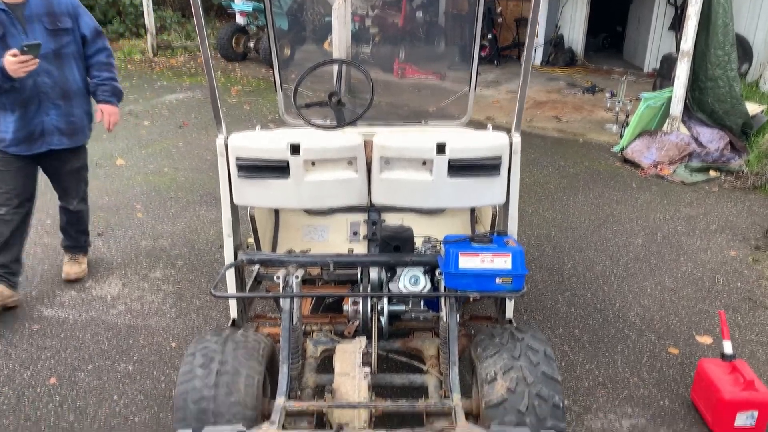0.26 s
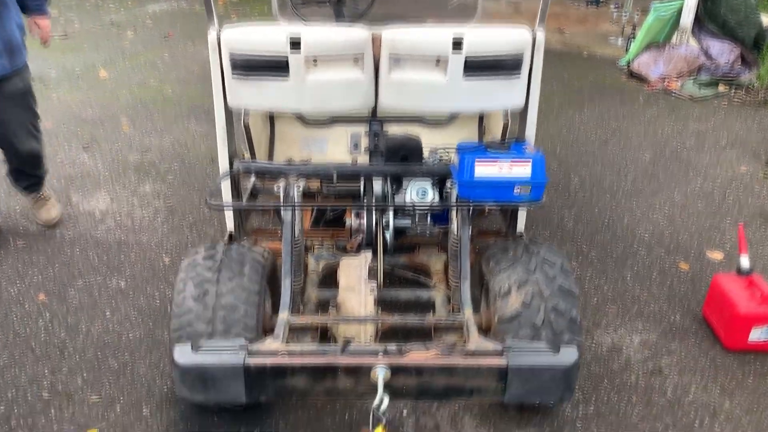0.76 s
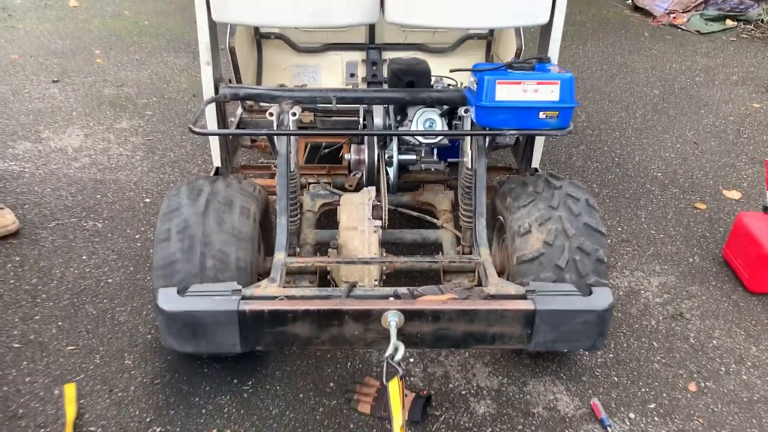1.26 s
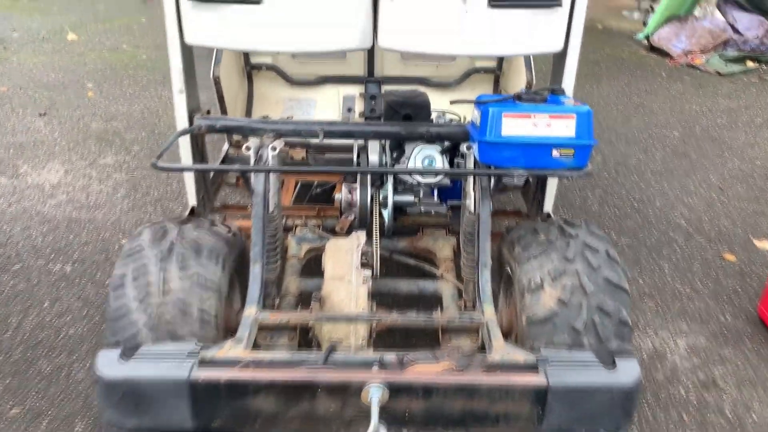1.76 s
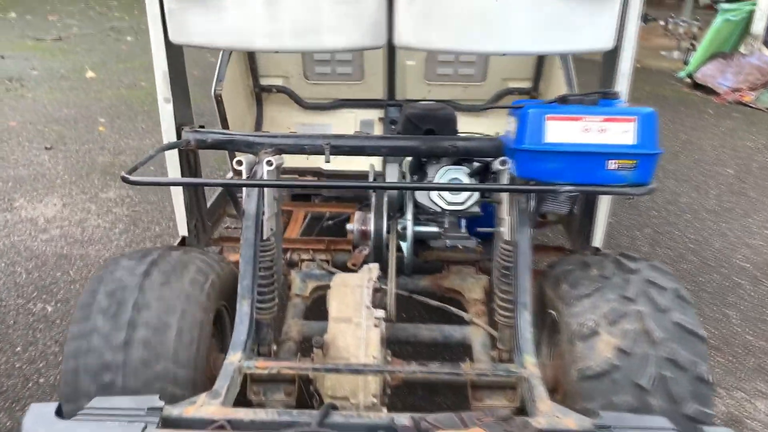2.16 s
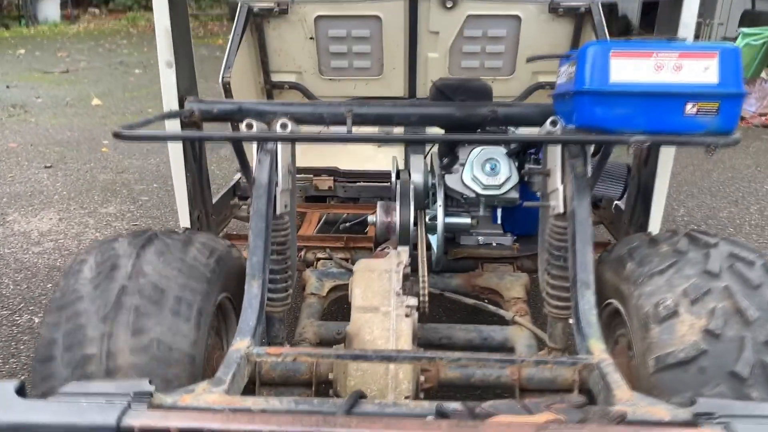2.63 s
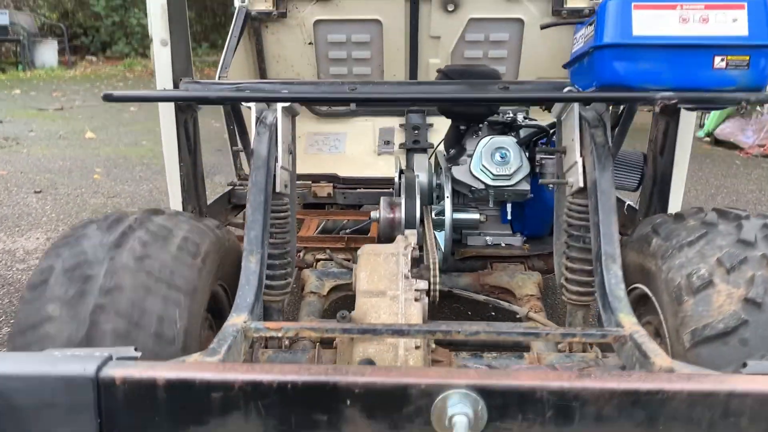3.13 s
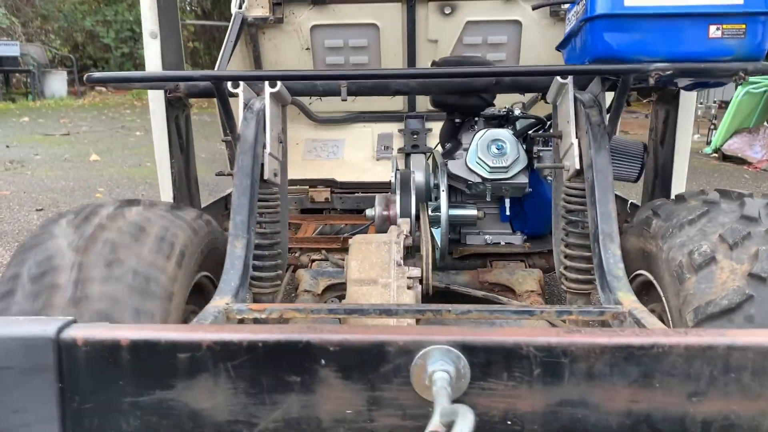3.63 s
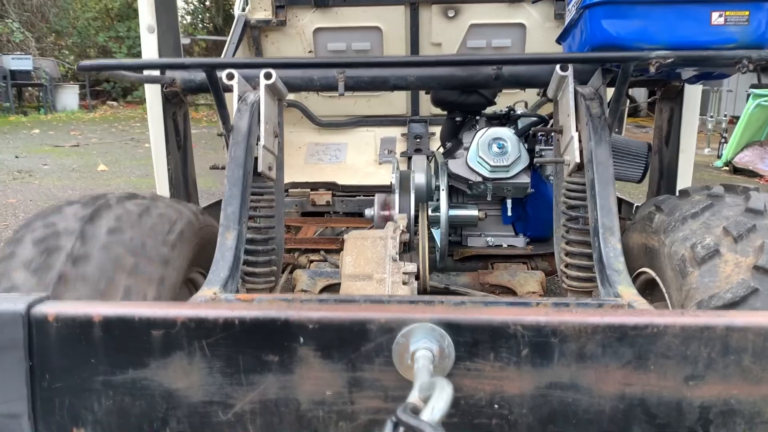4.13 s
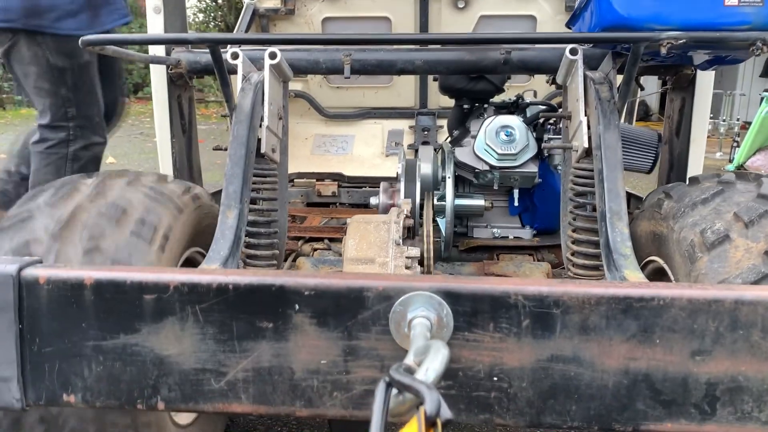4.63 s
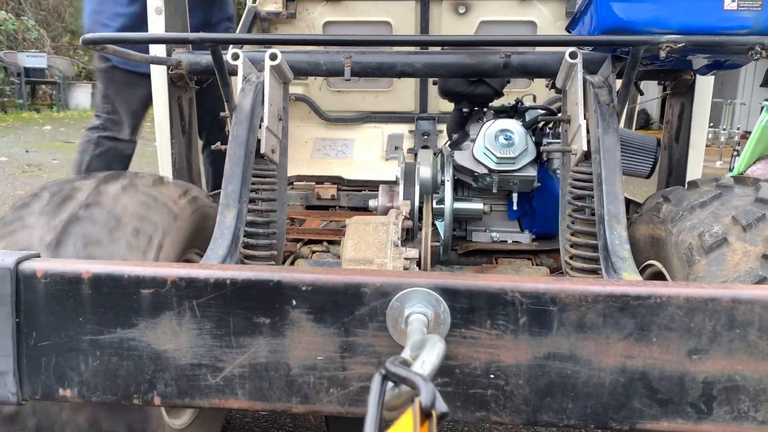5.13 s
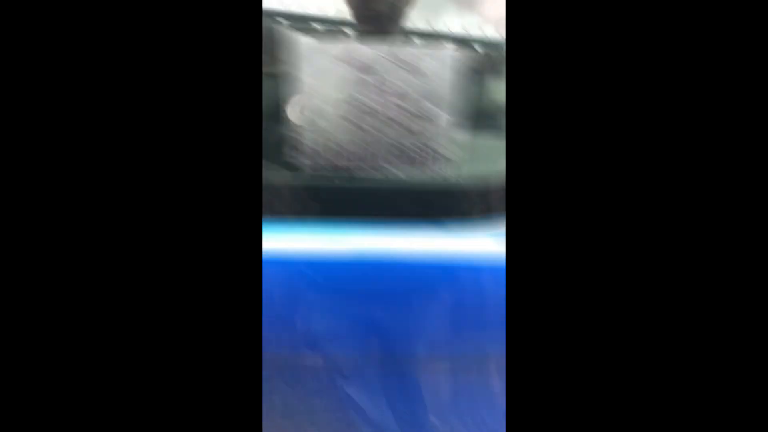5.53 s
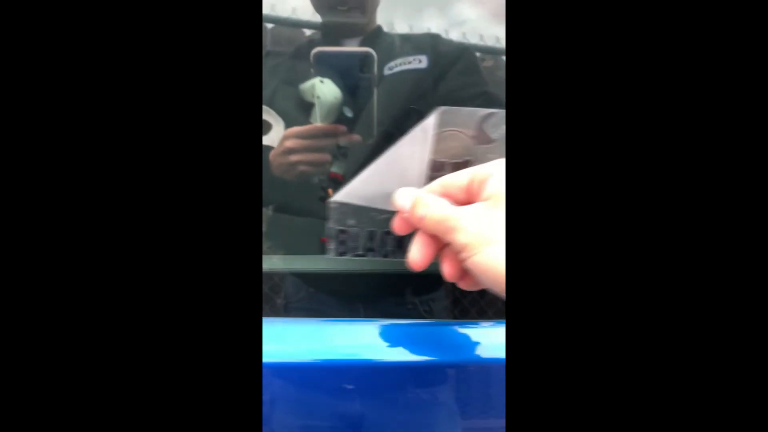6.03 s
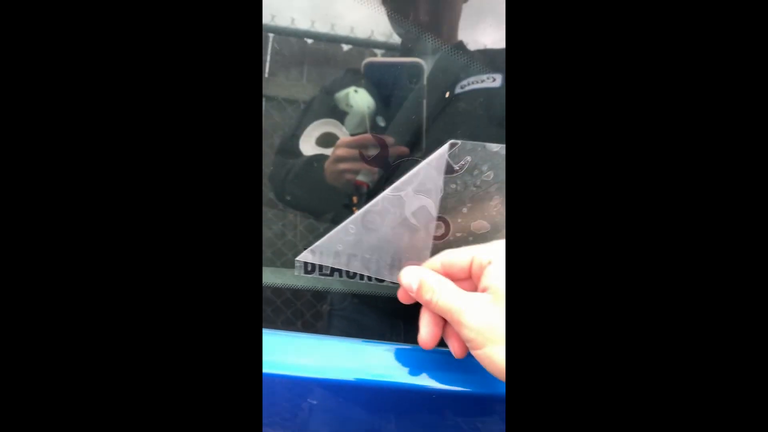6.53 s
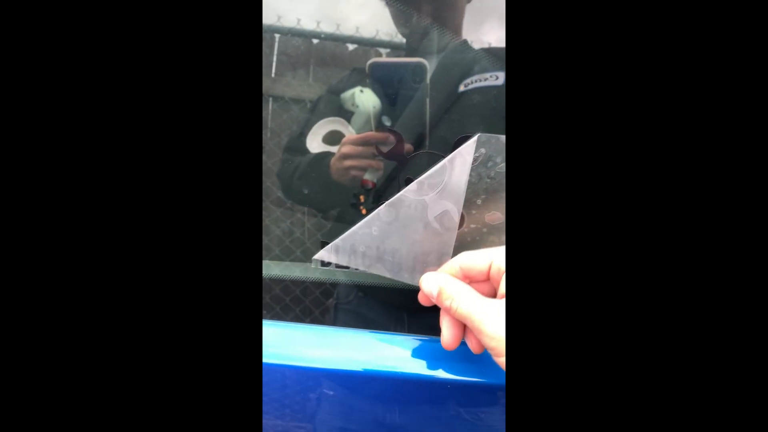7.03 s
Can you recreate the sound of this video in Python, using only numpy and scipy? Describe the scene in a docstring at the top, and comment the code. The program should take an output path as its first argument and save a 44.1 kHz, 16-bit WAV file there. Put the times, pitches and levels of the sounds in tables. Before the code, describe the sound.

Outdoors on asphalt, a small one-cylinder gasoline engine runs loud and lumpy, surging in runs of four to seven hard metallic knocks, then sagging into soft thumps, clatter, hiss and a hollow muffler hoot. The stereo microphone walks closer. An instant cut drops to a very quiet place with low rumble and hum, where plastic film crackles and snaps as it is peeled off glass.

```python
"""A one-cylinder four-stroke in a golf cart hunts at idle on a driveway as the stereo microphone walks up to it:
runs of hard, knocking firings, with faint ones between as it coasts on soft thumps, clatter and a hooting can.
Pulses timed by the engine cycle and shaped noise make the engine; asphalt and yard send the sound back.
An abrupt cut leads to a quiet place with a low rumble and hum, where a hand peels plastic film off
a car window: trains of tiny impacts crackle, noise bursts snap and a finger scrapes the glass."""
import sys
import numpy as np
from scipy import signal
from scipy.fft import rfft, irfft, next_fast_len
from scipy.io import wavfile
from scipy.ndimage import uniform_filter1d, map_coordinates

SR = 44100
rng = np.random.default_rng(int(sys.argv[2]) if len(sys.argv) > 2 else 0)


def log_audio(samples):
    """Write samples as a 16-bit WAV file to the path given in sys.argv[1]."""
    # one column per channel
    frames = np.atleast_2d(samples).T
    # limit to full scale, then quantise
    limited = np.clip(frames, -1, 1)
    pcm = np.round(limited * 32767).astype(np.int16)
    wavfile.write(sys.argv[1], SR, pcm)


N = 321038
CUT_S = 5.517  # the driveway gives way to the quiet place

# Firings that stand out, hard ones in runs and faint ones between. Each row: start in seconds, level in dB,
# low ring in Hz, high ring in Hz, high over low in dB, blast length in seconds, spit of gas in dB before its trim.
FIRINGS = [(0.001, -7.5, 710.0, 1877, 8.5, 0.002, -27), (0.044, -7, 670.0, 1850, 8, 0.003, -26.5),
           (0.087, -9.5, 1210.0, 1880, 8, 0.004, -27.5), (0.367, -20.5, 1350.0, 2130, 11, 0.006, -35.5),
           (0.467, -19, 1270.0, 2130, 6, 0.005, -32.0), (0.518, -14, 1350.0, 1770.0, 8.5, 0.003, -32.5),
           (0.569, -13.5, 1220.0, 1900, 1.5, 0.004, -26), (0.614, -10, 1310.0, 1810, 4.5, 0.003, -29.5),
           (0.658, -16.0, 880.0, 2650, -4.5, 0.004, -29.5), (0.702, -18, 1350.0, 1390, 0.0, 0.004, -36.0),
           (0.93, -24.0, 800.0, 2100.0, -3.5, 0.006, -45), (0.982, -22.0, 820.0, 2120, -5, 0.005, -40.5),
           (1.084, -21.5, 680.0, 1820, 9, 0.005, -33), (1.196, -11, 830.0, 2100, 2.5, 0.003, -26.5),
           (1.248, -14, 1010.0, 1770, 1.5, 0.003, -31), (1.304, -21, 690.0, 1490, 0, 0.006, -37.5),
           (1.354, -10.5, 700.0, 1570, 1.5, 0.005, -25.0), (1.405, -7.5, 670.0, 1803, 3, 0.002, -25.5),
           (1.452, -8.5, 840.0, 1750, 1, 0.004, -25.5), (1.493, -8.5, 940.0, 2120, 6.5, 0.003, -24.0),
           (1.533, -11.5, 830.0, 1510, -2, 0.003, -27.5), (1.899, -22, 820.0, 1640.0, -13, 0.005, -38),
           (1.999, -16, 1100.0, 2140, -4, 0.003, -28.5), (2.099, -10, 640.0, 1660, 6.5, 0.004, -23.5),
           (2.15, -8.5, 800.0, 1780, 0.5, 0.005, -26.0), (2.198, -9.5, 1350.0, 1780.0, 1.5, 0.004, -26),
           (2.238, -9.0, 1000.0, 1880, 2, 0.002, -25.5), (2.286, -20.5, 1350.0, 1330, 4, 0.004, -37),
           (2.563, -20.5, 750.0, 1910, -8, 0.003, -34.0), (2.611, -18, 900.0, 1960.0, -7.5, 0.002, -34.5),
           (2.663, -18.5, 930.0, 1450.0, -6.5, 0.005, -34.5), (2.716, -19, 650.0, 1540, -2.0, 0.007, -31.5),
           (2.818, -6.5, 1020.0, 1526, 5, 0.003, -27.0), (2.865, -6.5, 1100.0, 2340, -1, 0.003, -26),
           (2.914, -8.5, 1030.0, 1440.0, 7.5, 0.003, -30), (2.956, -15.5, 840.0, 2140, -0.5, 0.004, -31.5),
           (3.237, -20.5, 1060.0, 1670.0, -6, 0.004, -33), (3.285, -20, 630.0, 1810.0, -14.5, 0.004, -35.0),
           (3.336, -15.0, 1180.0, 1770, -5.5, 0.003, -29.5),
           (3.387, -13.5, 1070.0, 1680.0, -2.5, 0.002, -29.5), (3.433, -11, 990.0, 1650, -0.5, 0.004, -27),
           (3.48, -11, 1080.0, 1461, -6.0, 0.002, -28), (3.523, -14.5, 1200.0, 2130.0, -6, 0.003, -28.0),
           (3.567, -17.5, 770.0, 1810, -3.5, 0.006, -35.5), (3.85, -25, 580.0, 1568, -3, 0.007, -39),
           (3.899, -22.5, 920.0, 2140.0, -8, 0.007, -37), (4.005, -10.5, 1090.0, 1530, -5, 0.002, -28),
           (4.056, -9, 1060.0, 1790, 4, 0.003, -26.5), (4.106, -7.5, 1190.0, 1650.0, 4.5, 0.003, -25.5),
           (4.151, -9, 1060.0, 1630, 3, 0.004, -22), (4.197, -9, 1080.0, 1960.0, -1, 0.003, -27.0),
           (4.238, -14.5, 1050.0, 2316, -6, 0.003, -35), (4.464, -24.5, 1130.0, 1800.0, -10, 0.005, -45),
           (4.562, -20, 1180.0, 1760, -6.5, 0.003, -33), (4.668, -18, 1160.0, 1735, -12.5, 0.005, -39.5),
           (4.776, -6, 1350.0, 1690, 1, 0.002, -29), (4.83, -11, 1170.0, 2040, 4, 0.003, -27),
           (4.88, -9, 1190.0, 1660, 6, 0.003, -26.5), (4.927, -9.5, 1310.0, 2020.0, 4, 0.003, -26.5),
           (4.971, -7.5, 1080.0, 2310, 4, 0.003, -25.5), (5.012, -6, 1190.0, 1730, 0, 0.002, -28),
           (5.054, -14.5, 1060.0, 1670.0, -7, 0.004, -36)]
# Engine speed as the governor hunts, gaining in each run of firings and sagging between.
# Each row: time in seconds, cycle rate in Hz before cycles are aligned to the firings.
ENGINE_SPEED = [(0, 23), (.1, 23.8), (.3, 20.6), (.52, 19.2), (.7, 23.2), (.9, 21), (1.15, 17.8),
                (1.33, 19), (1.53, 24.8), (1.7, 22.2), (1.97, 19.2), (2.08, 19.2), (2.28, 23.3),
                (2.5, 20.6), (2.76, 19), (2.96, 23.4), (3.15, 20.8), (3.3, 19.6), (3.56, 23), (3.8, 20.2),
                (4.0, 18.7), (4.24, 23.8), (4.45, 21), (4.6, 19.2), (4.78, 18), (5.06, 24), (5.3, 21.3),
                (5.5, 19)]
# The microphone's walk up to the engine. Each row: time in seconds, gain in dB before a voice takes its share.
NEARNESS = [(0, -6), (1.05, -5), (1.4, -3), (2.2, -1), (3.1, -0.4), (3.8, 2.5), (4.4, -0.5), (5.5, 0.4)]
# Engine voices. Each holds: dB when coasting close by, dB more at full load, share of the nearness it follows.
THUMP_LEVEL = (-21.5, 3.9, 0.7)
CLATTER_LEVEL = (-29, 5.7, 0.24)
HISS_LEVEL = (-34, 6.7, 0.49)
MUFFLER_LEVEL = (-38, 14, -0.18)
# Engine spectra: firing blast, exhaust thump, engine block, gas and fan hiss.
# Each row: frequency in Hz, relative level in dB per Hz.
BLAST_SPECTRUM = [(120, -27.5), (300, -9), (450, -7.5), (700, -4.5), (1150, -3), (1800, -3.5), (2500, -10),
                  (2950, -17), (4000, -29), (7000, -22), (15500, -19.5)]
THUMP_SPECTRUM = [(20, -42.5), (32, -14.5), (44, 4.5), (62, 3), (82, 2.5), (105, 0.5), (130, 2),
                  (165, -4.5), (215, -20.5), (320, -28.5), (480, -52), (1000, -53)]
BLOCK_SPECTRUM = [(100, -12), (220, 7.5), (340, 0), (480, -0.5), (750, -1), (1200, -1), (1500, -1.5),
                  (2000, -1.5), (2650, -5), (3050, -16.5), (4500, -21.5), (9000, -50.5)]
HISS_SPECTRUM = [(1500, -21.5), (3200, 2.5), (4200, 0), (5400, -3.5), (7000, 2.5), (11000, -0.5),
                 (13400, -5), (15500, -5.5)]
# Resonances and dips of the covers and frame, each strongest at one part of the walk. Each row: frequency in Hz,
# width in Hz, boost or cut in dB at its strongest, strongest at seconds, reach in seconds either side.
PANELS = [(346, 39, 11, 0.68, 1.4), (470, 390, -5.5, 1.2, 0.75), (537, 90, 5, 3.8, 2.5),
          (690, 90, 5, 2.2, 0.97), (834, 140, 5.5, 1.5, 1.3), (1080, 90, 3.5, 4.1, 0.58),
          (1200, 52, 7.5, 4.6, 2.8), (1340, 150, 4, 0.89, 1.6), (1432, 120, 3, 2.8, .45),
          (1510, 88, -14.5, 5, 0.81), (1766, 150, 1, 5, 0.53), (1830, 140, 1.5, 0.6, 0.44),
          (2050, 130, 5, 0.68, 1.2), (2610, 220, 4.5, 0.19, .8)]
# The bounce off the asphalt, mostly lagging more nearer the engine. Each row: time in seconds, lag in seconds.
BOUNCE = [(0, 0.0015), (.7, 0.0017), (1.95, .0018), (2.65, 0.0022), (3.1, 0.002456), (3.7, 0.0029),
          (5.5, 0.0027)]
# Decay of the yard's scattered sound. Each row: frequency in Hz, time to fall by 60 dB in seconds.
YARD_DECAY = [(100, 0.26), (1000, 0.098), (4000, 0.26), (14000, 0.017)]
# Pulls on the film. Each row: start in seconds, length in seconds, crackle level in dB.
PULLS = [(5.596, 0.12, -75), (5.741, 0.028, -67), (5.827, 0.076, -65), (5.943, 0.063, -67),
         (6.094, 0.11, -78), (6.198, .07, -74), (6.261, 0.13, -63), (6.417, 0.095, -60),
         (6.521, 0.067, -72), (6.623, 0.36, -82), (7.02, 0.35, -75)]
# Snaps of film off the glass. Each row: start in seconds, nominal peak in dB, body level in dB.
SNAPS = [(5.7563, -47, -30), (5.762, -66, 0), (5.7717, -40.5, -37), (5.805, -65, -5), (5.8343, -56, -13),
         (5.843, -61, 0), (5.8574, -54, 5.5), (5.866, -56, -6), (5.883, -50, -18), (5.886, -35, -6),
         (5.902, -52, -3), (6.2604, -58, -2), (6.283, -60, -2)]
# Ringing of the taut film when it snaps. Each row: frequency in Hz, width in Hz, level in dB.
SHEET_MODES = [(750, 250, -4), (1750, 500, -3), (2530, 450, 4), (3660, 440, 4), (6500, 340, -1),
               (7350, 260, -2)]
# Spectra of the film and of a finger dragging on glass. Each row: frequency in Hz, relative level in dB per Hz.
FILM_SPECTRUM = [(600, -12), (1500, -15), (3000, -8), (4700, -2), (6000, -0.5), (11000, -1.5), (15500, 2.5)]
FINGER_SPECTRUM = [(120, -24), (240, 3), (400, -7), (900, -17), (1800, -19), (3500, -37)]
# Soft handling bumps. Each row: start in seconds, nominal peak in dB, frequency in Hz.
BUMPS = [(7.146, -33, 57.6)]
# A low hum far off, shifting in pitch. Each row: time in seconds, frequency in Hz, rms level in dB.
HUM = [(5.55, 63, -52), (5.6, 63, -44), (5.64, 63, -62), (5.7, 67, -49), (5.86, 71, -51), (5.92, 69.7, -43),
       (5.96, 69, -44), (6.01, 62, -56), (6.1, 50, -54), (6.27, 51, -61), (6.38, 55.7, -51),
       (6.47, 54, -52), (6.6, 53.7, -51), (6.76, 55.9, -62), (6.85, 56, -51), (7.05, 54, -52),
       (7.27, 54.8, -54)]
# Spectra of the low rumble and the distant hush. Each row: frequency in Hz, relative level in dB per Hz.
RUMBLE_SPECTRUM = [(13, -59), (22, -18), (37, -12), (64, -6), (124, -20), (141, -21.5), (242, -25),
                   (312, -38), (450, -57), (580, -61), (990, -120)]
HUSH_SPECTRUM = [(180, -28), (300, -7), (935, -7.5), (1270, -15.5), (1430, -16), (3000, -31), (3900, -66),
                 (6600, -120)]
# Likeness of the two microphone channels. Each row: frequency in Hz, left-right correlation.
LIKENESS = [(60, 0.96), (130, 1), (290, 0.91), (640, 0.65), (1400, 0.83), (2400, 0.62), (4600, 0.34),
            (7000, 0.32), (8400, 0.98), (15000, 0.82)]
# Phase between the microphone ports, by the engine and by the film. Each row: frequency in Hz, radians left leads.
ENGINE_PORTS = [(0, 0), (1720, 0), (3700, .9), (5300, 1), (6200, 0), (8650, -3.14), (15800, -12.6)]
FILM_PORTS = [(0, 0), (2900, 0), (4800, 3.14), (13100, 15.7), (16000, 19)]
# Balance of the microphone ports. Each row: frequency in Hz, left minus right in dB.
PORT_TILT = [(30, -0.5), (100, -3.24), (250, -1.6), (600, -4), (1300, -1.2), (2800, -1.1), (5500, -4),
             (9000, 1), (15000, -0.5)]


def barks(rise=0.0015, blast_decay=.0035, spit_rise=.005, spit_decay=.011, ring_rise=0.0023, pivot_hz=1350,
          knock_db=-2.5, overtone_db=-5, spit_trim_db=-1):
    """A firing, hard or faint, is a short blast, a knock ringing the muffler in two main tones and a spit of gas."""
    out = np.zeros((2, N))
    t = np.arange(SR // 20) / SR

    def burst(up, hold, fall):
        """Noise that swells, holds and dies away like escaping gas."""
        return noise(len(t)) * np.minimum(t / up, 1) ** 2 * np.exp(-np.maximum(t - hold, 0) / fall)

    def mode(hz):
        """One ringing tone of the steel, starting at a random phase."""
        return np.sin(2 * np.pi * (hz * t + rng.random())) * t * np.exp(-t / ring_rise)

    for s, db, low_hz, high_hz, bright_db, length, spit_db in FIRINGS:
        bright = amp(bright_db)
        stray = mode(rng.uniform(450, 1000)) + bright * mode(rng.uniform(1900, 2600))
        knock = unit(mode(low_hz) + bright * mode(high_hz) + amp(overtone_db) * stray)
        # brightness tilts the blast over one octave about the pivot
        slope = lambda hz: amp(bright_db * np.clip(np.log2((hz + 1) / pivot_hz), -.5, .5))
        gas = unit(stereo(burst(rise, length, blast_decay), BLAST_SPECTRUM, slope))
        blast = np.tanh(gas / 4.5)  # the strongest swings flatten
        add(out, s - .0008, amp(db - 14.0) * unit(unit(blast) + amp(knock_db) * knock))
        spit = unit(stereo(burst(spit_rise, 0.0054, spit_decay), HISS_SPECTRUM))
        add(out, s - .003, amp(spit_trim_db + spit_db) * spit)
    return out


def thumps(cycles, pipe_hz=82, width_hz=14, pipe_db=-5, upper_hz=156, upper_width_hz=24, upper_db=-7):
    """Each cycle sends a puff, a gulp and a rebound into the exhaust, which drones in two tones amid gas eddies."""
    load = throttle()
    drift = cycles + 0.008 * wobble(3)  # the gulp comes now earlier, now later
    steady = lambda phase, angle: strokes(phase, angle, scatter=.005, spread_db=.7)
    puff = steady(cycles, 0.077) * (0.84 + 0.37 * load)
    gulp = steady(drift, 0.318) * (1 - 1.8 * load)  # shrinks with load, then changes sign
    rebound = steady(cycles, 0.53) * 0.27

    def pipe(hz):
        """Gain of the pipe's two drones."""
        low = amp(pipe_db) * peak(hz, pipe_hz, width_hz)
        return 1 + low + amp(upper_db) * peak(hz, upper_hz, upper_width_hz)

    boom = unit(filtered(puff + gulp + rebound, lambda hz: amp(along(THUMP_SPECTRUM, hz)) * pipe(hz)))
    gusts = 0.5 + unit(chuffs(cycles, angle=0.14, spread_db=-1.0, decay=0.017))
    eddies = unit(stereo(noise() * gusts, THUMP_SPECTRUM))
    return loudness(*THUMP_LEVEL) * (boom + amp(-12) * eddies)


def muffler(cycles, cool_hz=310, hot_hz=358, width_hz=50, slap_db=-2, slap_spread_db=1.2):
    """Firings slap the can and gas streams through, so it hoots; heat under load, wandering, favours a higher tone."""
    heat = np.clip(uniform_filter1d(throttle(), size=4000) + 0.16 + 0.23 * wobble(2.8), 0, 1)
    gusts = unit(noise() * (7.0 + unit(chuffs(cycles, angle=.85, spread_db=3, decay=0.0037))))
    slaps = unit(strokes(cycles, angle=.03, scatter=.003, spread_db=slap_spread_db))
    drive = gusts + amp(slap_db) * slaps
    colour = [(120, -7), (250, -8.0), (450, -6.0), (900, -11.5)]  # Hz, dB per Hz
    can = lambda centre: unit(stereo(drive, colour, lambda hz: peak(hz, centre, width_hz)))
    return loudness(*MUFFLER_LEVEL) * (np.sqrt(1 - heat) * can(cool_hz) + np.sqrt(heat) * can(hot_hz))


def clatter(cycles):
    """Soft firings chuff unevenly, the valves tap, the covers rattle and the cooling fan hisses."""
    firing = unit(chuffs(cycles, angle=.88, spread_db=-1.5, decay=0.0047))
    valves = unit(sum(chuffs(cycles, angle, spread_db=-1, decay=0.0018) for angle in (.2, .33, .6)))
    rattle = grains(per_second=2200, spread_db=-1.0) * amp(1.7 * wobble(60))
    shaking = 0.79 * rattle + 0.45 * firing * noise() + 0.1 * valves * noise()
    shaking = shaking + .5 * grains(per_second=200, spread_db=-2.0)  # loose parts tick
    air = 0.82 * noise() + 0.45 * firing * noise() + 0.18 * valves * noise()
    block = loudness(*CLATTER_LEVEL) * unit(stereo(shaking, BLOCK_SPECTRUM))
    return block + loudness(*HISS_LEVEL) * unit(stereo(air, HISS_SPECTRUM))


def crank():
    """Engine cycles done so far, bent so that each listed firing falls on a whole number."""
    cycles = np.cumsum(curves(ENGINE_SPEED)[0]) / SR
    times = np.array(FIRINGS)[:, 0]
    at_bark = np.interp(times, clock(), cycles)
    whole = np.cumsum(np.round(np.diff(at_bark, prepend=at_bark[0])))  # whole cycles from one to the next
    return cycles - np.interp(clock(), times, at_bark - whole)


def throttle():
    """Load from 0 to 1: each listed firing raises it briefly by its level, hard ones most."""
    push = np.zeros(N)
    for s, db, *_ in FIRINGS:
        add(push, s, np.full(SR // 24, amp(db)))
    return np.clip(uniform_filter1d(push, size=400) / push.max(), 0, 1)


def loudness(coasting_db, load_db, share, load_s=0.047):
    """Gain of an engine voice: it grows with load, averaged over load_s, and takes a share of the nearness."""
    load = uniform_filter1d(throttle(), max(round(load_s * SR), 1))
    return amp(coasting_db + load_db * load + share * curves(NEARNESS)[0])


def strokes(cycles, angle, scatter, spread_db):
    """One impulse per cycle at the given share of it, uneven in time and size."""
    count = np.arange(int(cycles[-1]))
    chance = rng.standard_normal((256, 2))[:len(count)]
    where = np.searchsorted(cycles, count + angle + scatter * chance[:, 0])
    return np.bincount(where, amp(spread_db * chance[:, 1]), N + 1)[:N]


def chuffs(cycles, angle, spread_db, decay):
    """An envelope of one soft puff per cycle."""
    t = np.arange(SR // 20) / SR
    puff = t / decay * np.exp(-t / decay)
    return signal.fftconvolve(strokes(cycles, angle, 0.0041, spread_db), puff)[:N]


def panels(x):
    """Covers and frame boost or cut narrow bands, each change swelling and fading as the microphone walks past."""
    for hz, width_hz, db, s, reach in PANELS:
        facing = np.exp(-((clock() - s) / reach) ** 2)
        band = signal.lfilter(*signal.iirpeak(hz, hz / width_hz, SR), x)
        x = x + (amp(db * facing) - 1) * band
    return x


def ground(x, bounce_db=-12):
    """A dull, late copy from the asphalt sweeps a comb through the sound."""
    delay, = curves(BOUNCE)
    dull = filtered(x, lambda hz: amp(bounce_db) / np.hypot(1, hz / 3000))
    return np.array([np.interp(clock() - delay, clock(), side) for side in dull])


def yard(x, count=24):
    """The cart's body, the ground and a shed scatter the sound back, differently at each step of the walk."""
    out = np.zeros((2, N))
    hop = N // count
    for start in range(0, N - hop, hop):
        hz, t, z = signal.stft(noise(SR // 4), SR, nperseg=256)
        decay = amp(-60 * t / along(YARD_DECAY, hz)[:, None])
        tail = signal.istft(z * decay, SR, nperseg=256)[1]
        tail = stereo(tail / np.linalg.norm(tail[0]), [(100, 0), (10000, 0)])  # flat colour
        add(out, start / SR + .005, signal.fftconvolve(x[:, start:start + hop], tail, axes=1))
    return out


def film():
    """Film peels off glass in an uneven fine crackle with snaps; the sheet rings lower once freed; a finger drags."""
    crackle = grains(per_second=4000, spread_db=3.5) * amp(1.2 * wobble(45)) * [[1], [.3]]  # little side signal
    freed = np.interp(clock(), [6.35, 6.5], [0, 1])
    sheet = lambda centre: unit(stereo(crackle, FILM_SPECTRUM, lambda hz: 1 + 2.0 * peak(hz, centre, 450)))
    out = pulling() * ((1 - freed) * sheet(3740) + freed * sheet(2700))
    t = np.arange(SR // 30) / SR
    taut = lambda hz: .9 + sum(amp(db) * peak(hz, centre, width) ** 2 for centre, width, db in SHEET_MODES)
    for s, db, body_db in SNAPS:
        body = [(400, body_db - 6), (700, body_db + 5), (2000, body_db + 6), (2700, body_db + 1),
                (3600, body_db + 6)]
        colour = body + [(6000, -6), (15000, -0.5)]
        snap = unit(stereo(noise(len(t)) * np.exp(-t / 0.002), colour, taut))
        add(out, s, amp(db - 16.0) * snap)
    stroke = np.exp(-((clock() - 6.287) / .022) ** 2)  # centre and reach of the drag, seconds
    return out + amp(-59.5) * stroke * unit(stereo(grains(per_second=1200, spread_db=2), FINGER_SPECTRUM))


def pulling(rise_s=0.034, fall_s=0.03):
    """How hard the film crackles: each pull takes hold, lasts and dies away."""
    t = clock()
    level = np.zeros(N)
    for s, length, db in PULLS:
        hold = np.clip((t - s) / rise_s, 0, 1)
        level += amp(db) * hold * np.exp(-np.maximum(t - s - length, 0) / fall_s)
    return level


def outdoors(rumble_db=-52, waver_db=1.0, hush_db=-71.5, drone_hz=119, drone_db=-11.5):
    """Shaped noise rumbles and hushes far off, a low hum carries a weaker higher line, and the microphone is bumped."""
    rumble = amp(rumble_db + waver_db * wobble(5.3)) * unit(stereo(noise(), RUMBLE_SPECTRUM))
    out = rumble + amp(hush_db) * unit(stereo(noise(), HUSH_SPECTRUM))
    t = np.arange(SR // 10) / SR
    for s, db, hz in BUMPS:
        add(out, s, amp(db) * np.sin(2 * np.pi * hz * t) * (t / 0.0093) * np.exp(1 - t / 0.0082))
    hum_hz, hum_db = curves(HUM)
    tone = lambda hz: np.sqrt(2) * np.sin(2 * np.pi * np.cumsum(hz) / SR)
    drone = tone(drone_hz + 1.5 * wobble(7.3))  # wanders in pitch
    return out + amp(hum_db) * (tone(hum_hz) + amp(drone_db) * drone)


def ports(x, leads):
    """Sound meets the two microphone ports with a phase lead and balance by frequency, the right mostly louder."""
    size = next_fast_len(N + SR // 4)
    hz = np.fft.rfftfreq(size, 1 / SR)
    half = np.exp(.5j * np.interp(hz, *np.transpose(leads))) * amp(along(PORT_TILT, hz) / 2)
    return irfft(rfft(x, size) * np.array([half, 1 / half]), size)[:, :N]


def stereo(pair, spectrum, body=np.ones_like):
    """Two signals become a coloured left and right, mixed as mid and side to the likeness of each band."""
    turn = lambda hz: np.arccos(np.clip(along(LIKENESS, hz), -.99, .99)) / 2
    colour = lambda hz: amp(along(spectrum, hz)) * body(hz)
    mid = filtered(pair[0], lambda hz: colour(hz) * np.cos(turn(hz)))
    side = filtered(pair[1], lambda hz: colour(hz) * np.sin(turn(hz)))
    return np.array([mid + side, mid - side])


def filtered(x, gain):
    """x through the causal minimum-phase filter whose gain is the given function of frequency."""
    size = 2 * next_fast_len(x.shape[-1] // 2 + 4096)
    cepstrum = irfft(np.log(np.maximum(gain(np.fft.rfftfreq(size, 1 / SR)), 1e-6)))
    # folding the cepstrum forward in time makes the filter causal
    cepstrum[1:size // 2] *= 2
    cepstrum[size // 2 + 1:] = 0
    return irfft(rfft(x, size) * np.exp(rfft(cepstrum)), size)[..., :x.shape[-1]]


def peak(hz, centre, width):
    """Gain of one resonance."""
    return 1 / np.hypot(1, 2 * (hz - centre) / width)


def noise(size=N):
    """Two unrelated white noises."""
    return rng.standard_normal((2, size))


def grains(per_second, spread_db):
    """Two trains of tiny impacts of random size."""
    hits = rng.random((2, N)) < per_second / SR
    return unit(noise() * hits * amp(spread_db * noise()))


def wobble(rate):
    """A smooth random curve, rate knots a second."""
    return map_coordinates(rng.standard_normal(int(N * rate / SR) + 4), [clock() * rate])


def add(track, s, sound):
    """Mix a sound in at time s."""
    part = track[..., max(round(s * SR), 0):][..., :sound.shape[-1]]
    part += sound[..., :part.shape[-1]]


def amp(db):
    """Decibels to gain."""
    return 10 ** (np.asarray(db) / 20)


def unit(x):
    """Scaled to rms 1."""
    return x / np.sqrt(np.mean(x ** 2) + 1e-20)


def along(points, hz):
    """(Hz, value) points read on a log axis."""
    f, v = np.transpose(points)
    return np.interp(np.log(hz + 1), np.log(f + 1), v)


def clock():
    """The time of each sample in seconds."""
    return np.arange(N) / SR


def curves(rows):
    """One value per sample for each column after the time."""
    s, *cols = np.transpose(rows)
    return [np.interp(clock(), s, c) for c in cols]


def scene():
    """The engine on the driveway, a little to the right, until the cut; then the quiet place."""
    cycles = crank()
    metal = panels(barks() + clatter(cycles))
    engine = thumps(cycles) + muffler(cycles) + metal + ground(metal) + amp(-9.0) * yard(metal)
    before = np.exp(-np.maximum(clock() - CUT_S + 0.0085, 0) / 0.008)
    driveway = before * ports(engine, ENGINE_PORTS)
    return driveway + (1 - before) * ports(film() + outdoors(), FILM_PORTS)


def record(dry, top_hz=15950):
    """The microphone adds faint self-noise and rounds tall peaks; nothing passes above top_hz."""
    size = next_fast_len(N + SR // 4)
    hz = np.fft.rfftfreq(size, 1 / SR)
    heard = dry + amp(-94) * noise()
    rounded = heard / (1 + np.abs(heard / .82) ** 5) ** (1 / 5)
    return irfft(rfft(rounded, size) * np.clip((top_hz - hz) / 200, 0, 1), size)[:, :N]


dry = scene()
out = record(dry)
log_audio(out)
```